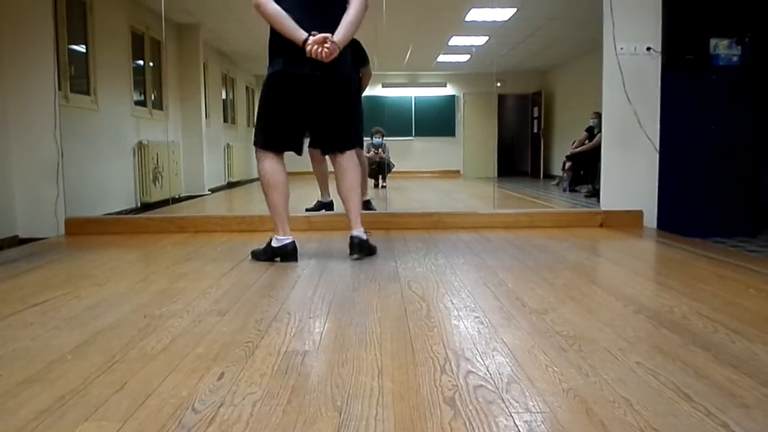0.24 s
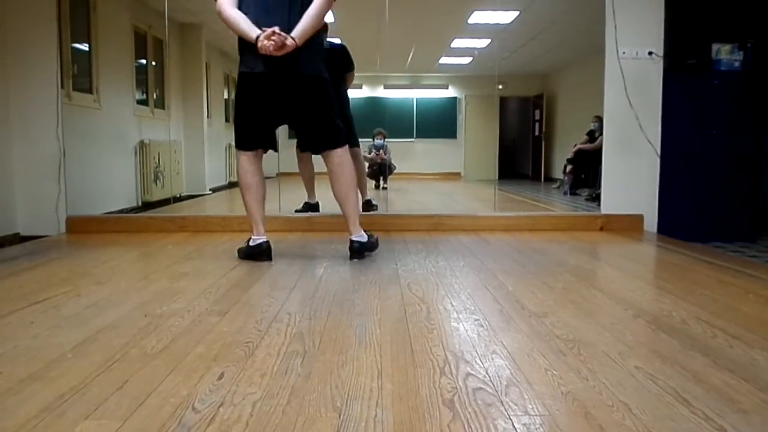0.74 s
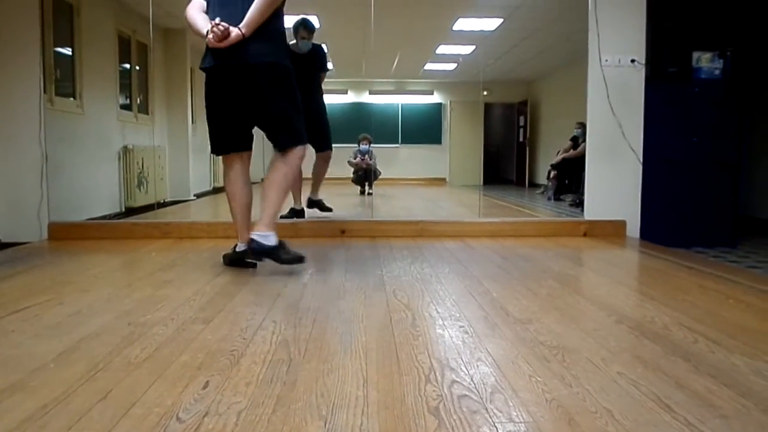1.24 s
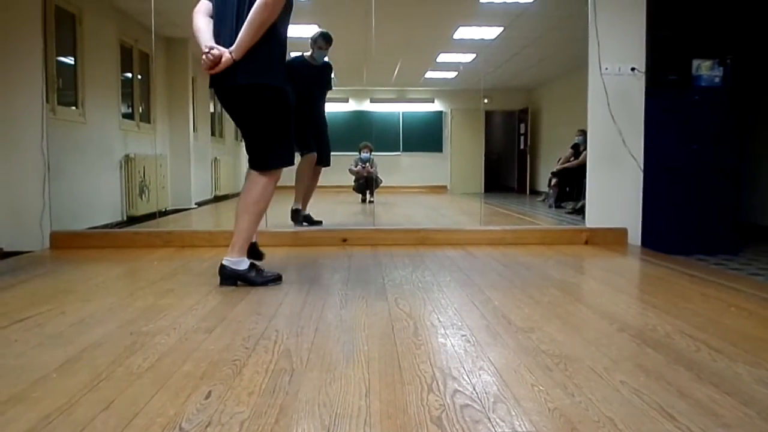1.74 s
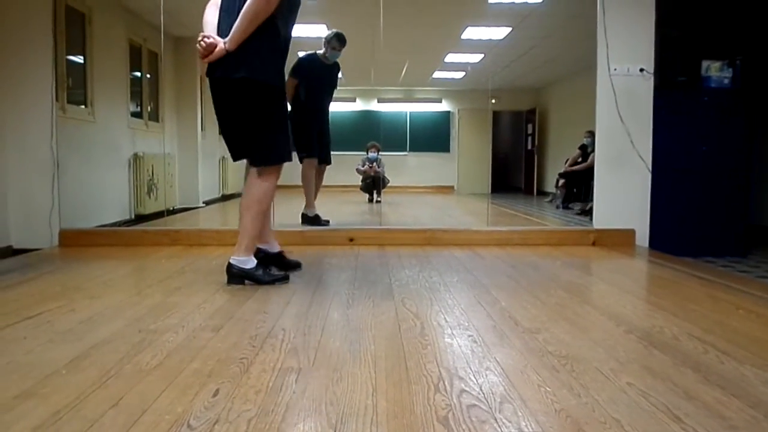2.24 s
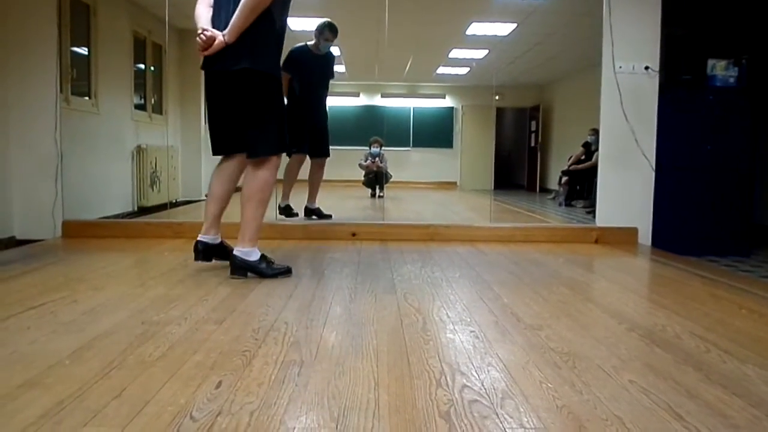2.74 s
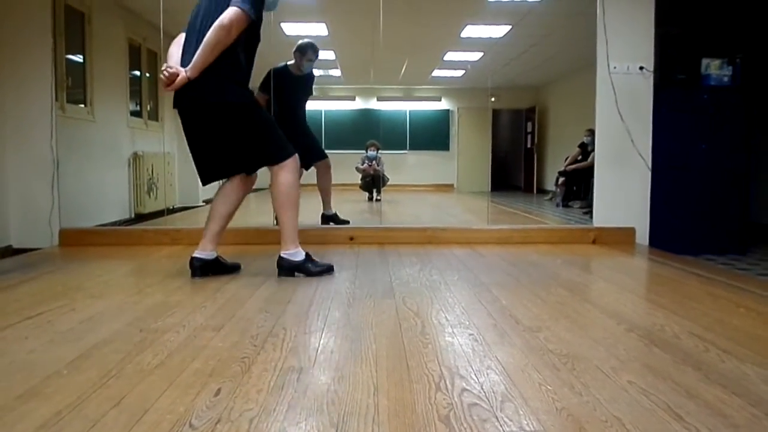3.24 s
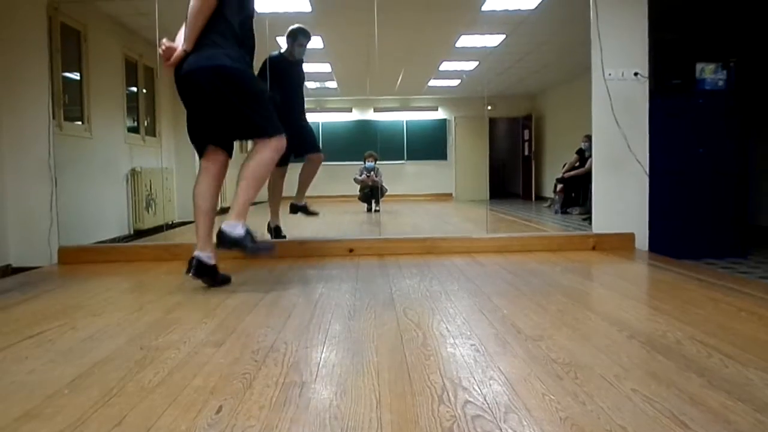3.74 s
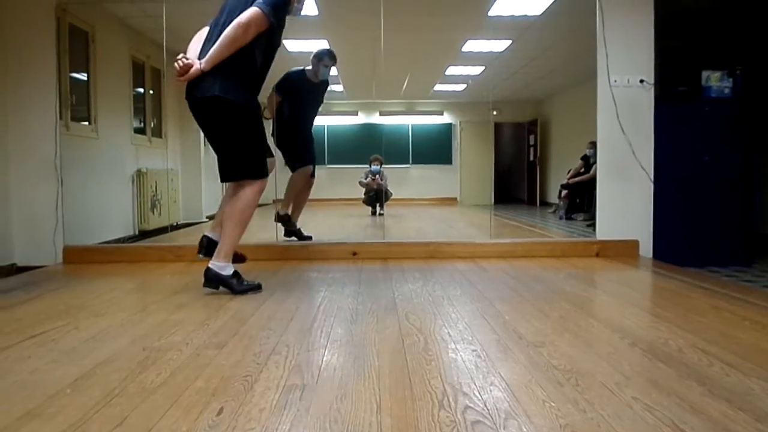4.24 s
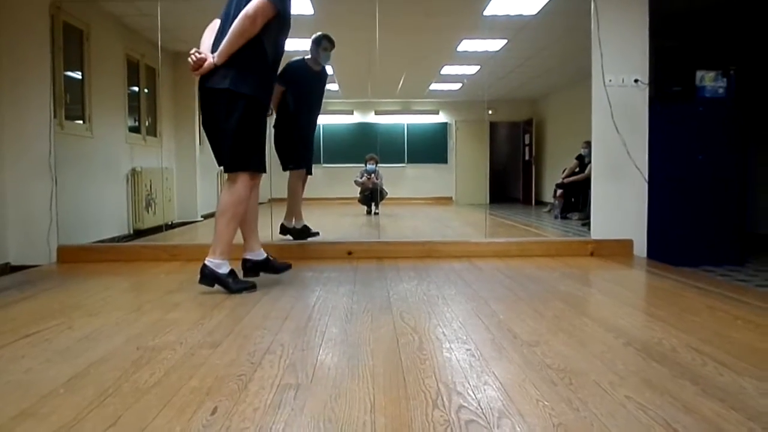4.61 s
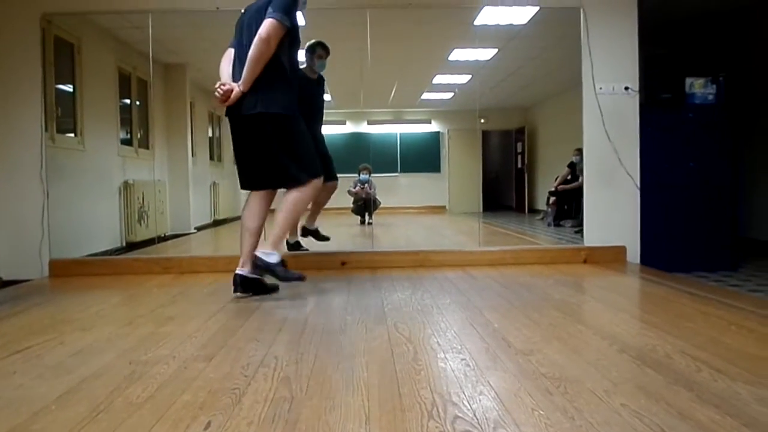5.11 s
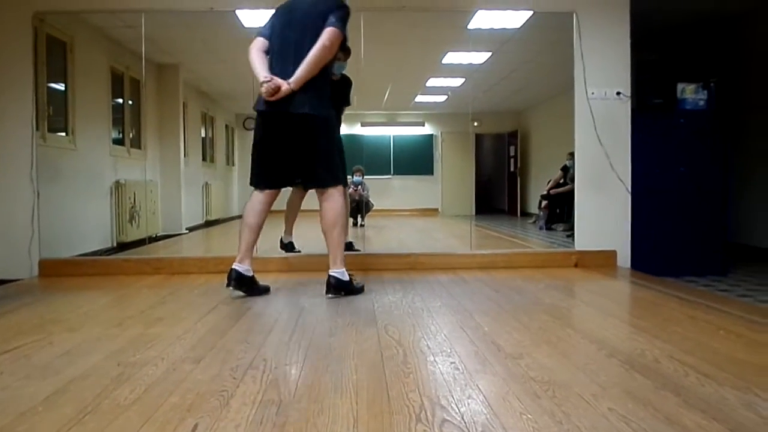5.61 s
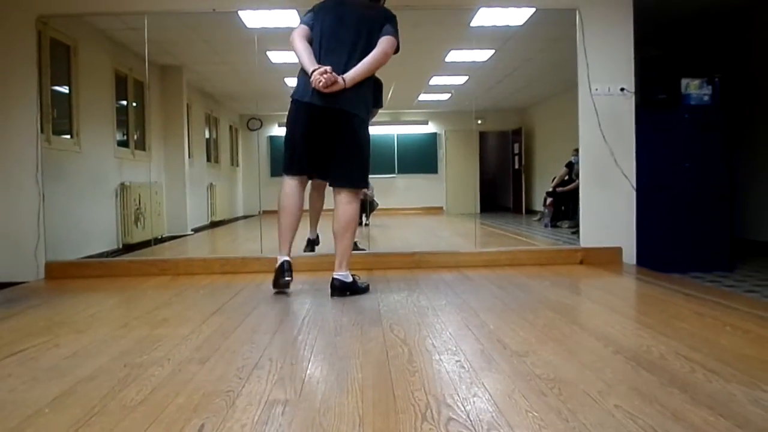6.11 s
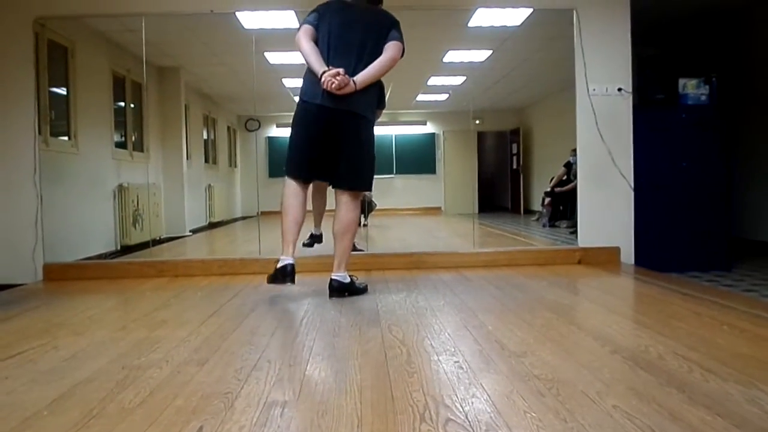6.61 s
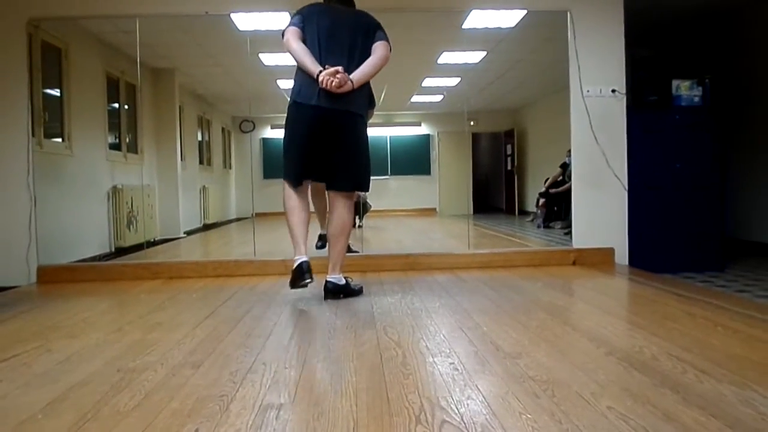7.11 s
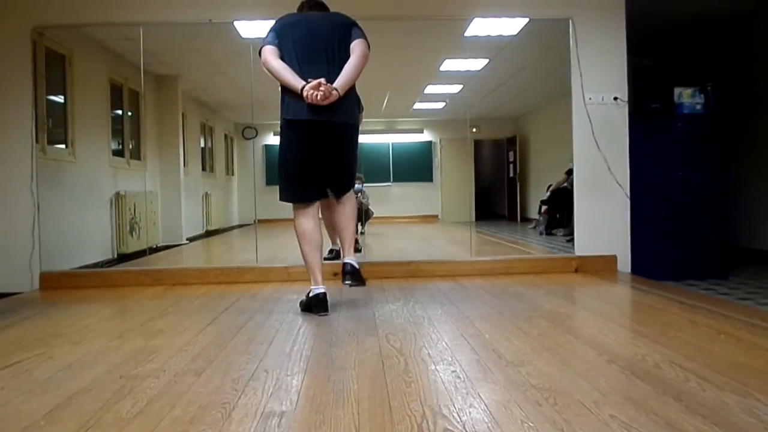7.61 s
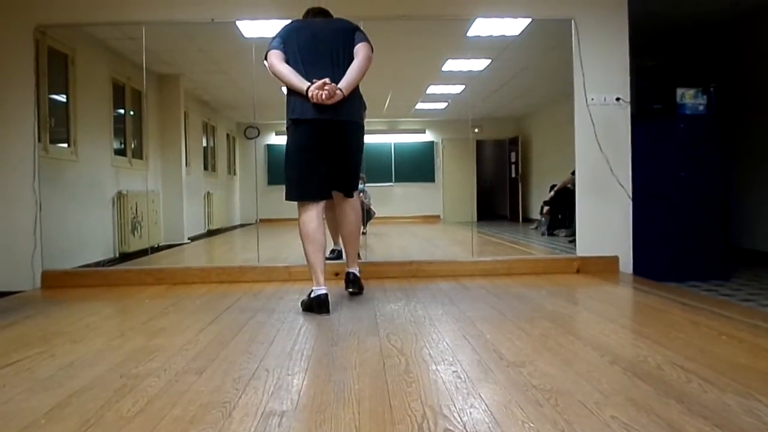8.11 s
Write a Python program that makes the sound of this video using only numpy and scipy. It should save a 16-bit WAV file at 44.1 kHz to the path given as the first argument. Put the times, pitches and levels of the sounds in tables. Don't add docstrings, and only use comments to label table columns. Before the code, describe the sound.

In a bare, live studio, hard-soled shoes strike a sprung wooden floor, picked up by a small microphone at floor height. The tail of an earlier step and a low floor rumble open the sound, with duller heel knocks at 0.05, 0.3 and 0.6 s. Crisp double toe taps follow at 1.1 and 1.4 s, then a tight cluster at 2.0, a flatter step at 2.3, a brush around 2.5, and sharp clicks at 2.8 and 3.1. A muffled low thud comes at 3.5, a quick three-tap run at 3.75-3.95, then taps at 4.4 and 4.7 with a sudden scuff between. Bright taps land at 5.3 and 5.6, then steadier at 6.1, 6.4, 6.7 and 6.95. Strong clicks sound at 7.3, 7.8 and 8.1. Each rings woody and echoes briefly over faint hush.

```python
import sys
import numpy as np
from scipy import signal
from scipy.fft import rfft, irfft, next_fast_len
from scipy.io import wavfile
from scipy.ndimage import uniform_filter1d, map_coordinates

SR = 44100
rng = np.random.default_rng(int(sys.argv[2]) if len(sys.argv) > 2 else 0)


def unload_wav(signal):
    wavfile.write(
        sys.argv[1],
        SR,
        np.round(np.clip(np.atleast_2d(signal).T, -1, 1) * 32767).astype(np.int16),
    )


def level_to_linear(level):
    exponent = np.asarray(level, float) / 20
    return 10 ** exponent


N = 368235
RING = 4 * SR // 5
BLOW = 2 ** 13
LEAD = 400
DETUNE, SPREAD = 0.04, 0.24
UPPER_DB = -6.5

# start in seconds, click in dB, deep boom in dB and
# knock in dB (both relative to the click), board note in Hz.
HEELS = [(-.22, -4.5, -10, -13, 1020), (0.0501, -15, -6.5, -0.5, 1050), (0.2967, -14.5, -9, -2, 681),
         (0.589, -11.5, -10, -5, 917), (1.9731, -20.5, 2, 4, 670), (1.9942, -8, -21.5, -15, 732),
         (2.2787, -19.5, -12, -15.5, 829), (2.8159, -5, -29.5, -12, 663), (3.1145, -12.5, -16, -6.5, 926),
         (3.5407, -51, 1, 0.5, 614), (7.272, -3, -37.5, -15, 730), (8.129, -5, -29, -17, 600)]
# start in seconds, click in dB, weight in dB, edge in dB, sole note in Hz.
TOES = [(1.1304, -7.5, -15, -8, 2270), (1.434, -7.5, -11.5, -10, 2100), (3.746, -7.5, -18, -9.5, 2600),
        (3.8304, -11.5, -7.5, -11, 2460), (3.9419, -9.5, -17.5, -5.5, 2720),
        (4.4404, -14, -13.5, -9.5, 1820), (4.733, -5.5, -15.5, -14.5, 3100), (5.267, -9.5, -15, -9, 3920),
        (5.569, -4, -19, -11.5, 2540), (6.1302, -9, -13, -10, 2250), (6.4118, -8, -16.5, -12.5, 1900),
        (6.6879, -5, -12, -15, 2680), (6.9505, -7.5, -13.5, -13.5, 2270), (7.8162, -2, -27, -13, 2420)]
# start in seconds, click in dB,
# weight in dB, edge in dB, sole note in Hz.
SLAPS = [(0.0623, -25.5, -12, 1.5, 2060), (0.279, -33.5, -7, 7.5, 3880), (1.1379, -7.5, -28.5, -28, 3750),
         (1.442, -11, -17, -31.5, 2350), (1.9822, -15.5, -2.5, -13, 3160), (2.0007, -16.5, -22, 4, 2790),
         (2.0082, -21.5, -2.5, -9, 2590), (2.2843, -9.5, -20.5, -24.5, 1900),
         (2.8287, -11.5, -8.5, -1, 2780), (3.1362, -6.5, -11, -9.5, 2270), (3.7556, -10, -19, -30, 3000),
         (3.8385, -16.5, -11.5, -14, 2800), (3.9486, -14.5, -19.5, -24, 2720),
         (4.4461, -6.5, -24.5, -17, 2340), (4.7393, -4, -18, -25, 2260), (5.2728, -3.5, -29.5, -18.5, 2030),
         (5.5741, -18, -5, -18, 2400), (6.745, -20.5, -12, -15.5, 2270), (7.8231, -13.5, -9, -26, 2300)]
# start in seconds, hold in seconds, level in dB.
SWAYS = [
    (-.1, 0.68, -39.5),
    (3.0, .1, -65),
    (3.854, 0.21, -69.5),
    (7.35, 0.16, -55.5),
    (7.853, .1, -69),
]
# peak in seconds, level in dB, rise in seconds and fall in seconds
# (each over 20 dB).
STROKES = [
    (0.78, -68, .05, .12),
    (1.77, -55, 0.095, .06),
    (1.902, -61, 0.19, 0.064),
    (2.51, -46.5, 0.15, 0.18),
    (2.77, -50, 0.36, 0.031),
    (4.53, -35.5, 0.041, .17),
    (6.085, -50, 0.13, 0.053),
    (7.68, -61, 0.25, .2),
]
# start in seconds, level in dB, board note in Hz.
SHIFTS = [
    (2.7, -43, 409),
    (4.649, -29.5, 622),
    (7.735, -36, 950),
]
# centre in Hz, width in Hz, level in dB.
SOLE = [(2435, 880, -1), (3400, 2600, -2.5)]
# centre in Hz, width in Hz, level in dB.
EDGE = [(8500, 27000, 6.5), (11760, 1500, 14), (14500, 4300, -28)]
# centre in Hz, width in Hz, level in dB.
BOARDS = [(610, 156, 12.5), (680, 730, 6), (990, 760, 2), (1310, 110, 1)]
# centre in Hz, width in Hz, level in dB.
PANELS = [(245, 74, -3), (313.5, 70, 4), (434.4, 130, 0.5)]
# centre in Hz, width in Hz, level in dB.
JOISTS = [(85, 56, -4), (158, 83, 3)]
# delay in seconds, level in dB.
WALLS = [(.0006, -3), (.0052, -3), (.0088, -2), (.012, -7), (.0172, -6), (.022, -9)]
# frequency in Hz, time to fall 60 dB in seconds.
EARLY = [(60, 0.11), (300, 0.6), (1000, 0.13), (3000, 0.12), (12000, 0.12)]
# frequency in Hz, time to fall 60 dB in seconds.
LATE = [(60, 0.27), (160, 1.0), (420, 1.0), (1100, 0.8), (2900, 0.85), (7700, 0.76), (14000, 0.4)]
# frequency in Hz, level in dB.
WET = [(60, -1), (300, 7), (1000, 11), (3000, -1), (7000, -3.5), (12000, -0.5)]
# frequency in Hz, level in dB, time to fall 60 dB in seconds.
STANDING = [(89, 1.5, 0.61), (157.1, 2, 0.77), (205.7, 0, 1.05), (254, 4.5, 0.92), (290.7, -11.5, 2),
            (321, 2.5, 0.86), (375, -8.5, 1.52), (427, -3, 0.73), (490, 6.5, 0.25)]
# frequency in Hz, density in dB per Hz.
VARNISH = [(300, 4.5), (1000, -2), (3000, -11), (8000, -9), (11900, -0.5), (15000, -6)]
# frequency in Hz, density in dB per Hz.
HUSH = [(15, -24), (25, -23), (87, -7.5), (483, 8), (553, 4.5), (1550, -15.5), (2900, -21), (7920, -32.5),
        (11900, -17), (16500, -21.5)]
# frequency in Hz, gain in dB.
MICROPHONE = [(40, -3.5), (120, -3.5), (300, -4), (550, -3), (1000, 3), (2500, 3), (6000, -0.5),
              (12000, -4.5), (15300, -12), (16300, -32.5), (17000, -71)]


def along(points, hz):
    f, v = np.transpose(points)
    return np.interp(np.log(hz + 1), np.log(f + 1), v)


def noise(gain):
    m = next_fast_len(N)
    spectrum = rfft(rng.standard_normal(m)) * gain(np.fft.rfftfreq(m, 1 / SR))
    x = irfft(spectrum, m)[:N]
    return x / np.std(x)


def wobble(rate):
    knots = rng.standard_normal(int(N * rate / SR) + 4)
    return map_coordinates(knots, [np.arange(N) * rate / SR])


def swell(start, end, db, rise_s, fall_s):
    t = np.arange(N) / SR
    outside = np.maximum((start - t) / rise_s, (t - end) / fall_s)
    return level_to_linear(db - 20 * np.maximum(outside, 0))


def power(modes, db, scatter_db=2.5, detune=DETUNE):
    f = np.fft.rfftfreq(BLOW, 1 / SR)
    total = 0
    for (centre, width, mode_db), (a, b) in zip(modes, rng.standard_normal((len(modes), 2))):
        c = centre * (1 + detune * b)
        shape = (f * width) ** 2 / ((c * c - f * f) ** 2 + (f * width) ** 2)
        total = total + level_to_linear(2 * (db + mode_db + scatter_db * a)) * shape ** (3 / 2)
    return total


def causal(spectrum):
    cepstrum = irfft(np.log(spectrum + 1e-12) / 2)
    cepstrum[1:BLOW // 2] *= 2
    cepstrum[BLOW // 2 + 1:] = 0
    return irfft(np.exp(rfft(cepstrum)))[:BLOW // 2]


def scattered(x, spread_s):
    knots = spread_s * rng.random(40)
    delay = np.interp(np.linspace(0, len(knots) - 1, BLOW // 2 + 1), np.arange(len(knots)), knots)
    phase = 2 * np.pi * np.cumsum(delay) * SR / BLOW
    return irfft(rfft(x, BLOW) * np.exp(-1j * phase))[:BLOW // 2]


def through_floor():
    rise = np.exp(np.arange(-LEAD, 0) / SR / 0.003)
    return level_to_linear(-22) * uniform_filter1d(rng.standard_normal(LEAD), size=4) * rise


def reverberation(late_db, wet_db):
    hz, t, z = signal.stft(rng.standard_normal(RING), SR, nperseg=256)
    early = level_to_linear(-60 * t / along(EARLY, hz)[:, None])
    late = level_to_linear(late_db - 60 * t / along(LATE, hz)[:, None])
    strength = level_to_linear(along(WET, hz))[:, None]
    tail = signal.istft(z * (early + late) * strength, SR, nperseg=256)[1][:RING]
    build_up = 1 - np.exp(-np.arange(RING) / SR / 0.005)
    return level_to_linear(wet_db) * tail * build_up


def standing(db):
    t = np.arange(RING // 10) * 10 / SR
    notes = 0
    for (hz, mode_db, t60), (a, b) in zip(STANDING, rng.standard_normal((len(STANDING), 2))):
        notes = notes + level_to_linear(db + mode_db + 2.5 * a - 60 * t / t60) * np.sin(2 * np.pi * (hz * t + b))
    return signal.resample(notes * np.minimum(t / 0.0056, 1), RING)


def wall_echoes():
    echoes = np.zeros(RING)
    for (s, db), (a, b) in zip(WALLS, rng.standard_normal((len(WALLS), 2))):
        echoes[round(s * (1 + 0.04 * abs(a)) * SR)] = level_to_linear(db + 1.5 * b)
    dull = np.exp(-2 * np.pi * 5000 / SR)
    return signal.lfilter([(1 - dull) ** 2], [1, -2 * dull, dull ** 2], level_to_linear(-2) * echoes)


def near_boards():
    def lag(hz):
        rate = 2 * np.pi * hz / SR
        return rate * np.exp(-rate * np.arange(LEAD))
    return level_to_linear(7.5) * (lag(700) - lag(220))


def studio(late_db, wet_db):
    response = reverberation(late_db, wet_db) + standing(db=-49.0) + wall_echoes()
    response[0] = 1
    response[:LEAD] += near_boards()
    return response


def contact(db, deep_db, boom_db, knock_db, edge_db, note_db, note_hz, upper_db, upper_hz, board_hz):
    board = power(BOARDS, knock_db + 17.5)
    board = board + power([(board_hz, 160, 0)], knock_db + 26.0, scatter_db=0, detune=0)
    wood = power(JOISTS, deep_db + 37.5) + power(PANELS, boom_db + 31.0) + board
    notes = [(note_hz, 0.4 * note_hz, 12), (upper_hz, 0.28 * upper_hz, upper_db + 15)]
    sole = power(SOLE, 8.83) + power(notes, note_db - db, scatter_db=0, detune=0)
    edge = power(EDGE, edge_db + 13, detune=DETUNE / 2)
    blow = scattered(causal(wood + sole + edge), spread_s=0.0008)
    path = np.append(through_floor(), studio(late_db=-13.5, wet_db=-24))
    return level_to_linear(db) * signal.fftconvolve(blow, path)[:RING]


def heel(db, deep_db, knock_db, board_hz):
    a, b = np.exp(SPREAD * rng.standard_normal(size=2))
    return contact(db, deep_db, boom_db=-8.5 + 0.55 * knock_db, knock_db=knock_db, edge_db=-12,
                   note_db=db + 3, note_hz=2580 * a, upper_db=UPPER_DB, upper_hz=5490 * b, board_hz=board_hz)


def tap(db, weight_db, edge_db, note_hz, deep_db, knock_db, note_db, board_hz):
    hard_db = edge_db + 13
    spot = np.exp(SPREAD * rng.standard_normal())
    return contact(db, weight_db + deep_db, boom_db=weight_db, knock_db=knock_db + 0.54 * weight_db,
                   edge_db=edge_db, note_db=db + note_db - 0.81 * hard_db, note_hz=note_hz,
                   upper_db=UPPER_DB + 0.7 * hard_db, upper_hz=2.27 * note_hz, board_hz=board_hz * spot)


def toe(*row):
    return tap(*row, deep_db=-21.5, knock_db=-9, note_db=3, board_hz=730)


def slap(*row):
    return tap(*row, deep_db=-5.5, knock_db=-14.5, note_db=-8.5, board_hz=600)


def steps():
    out = np.zeros(N + 3 * RING)
    for strike, table in [(heel, HEELS), (slap, SLAPS), (toe, TOES)]:
        for s, *row in table:
            first = RING + round((s + 0.0017) * SR) - LEAD
            out[first:][:RING] += strike(*row)
    return out[RING:RING + N]


def rumble():
    sway = level_to_linear(-86) + sum(swell(s, s + hold, db, 0.1, 0.56) for s, hold, db in SWAYS)
    return sway * noise(lambda hz: 1 / (1 + ((hz - 38) / 7) ** 2) ** 2)


def hush():
    return level_to_linear(-57.5 + 0.8 * wobble(17.0)) * noise(lambda hz: level_to_linear(along(HUSH, hz)))


def brushing():
    stroke = sum(swell(s, s, db, rise, fall) for s, db, rise, fall in STROKES)
    soft = uniform_filter1d(uniform_filter1d(stroke, size=1500), size=1500)
    grain = level_to_linear(1.5 * wobble(90))
    return level_to_linear(-0.5) * soft * grain * noise(lambda hz: level_to_linear(along(VARNISH, hz)))


def shifts():
    out = np.zeros(N + RING)
    for s, db, hz in SHIFTS:
        push = np.hanning(900) * rng.standard_normal(900)
        board = signal.fftconvolve(push, causal(power([(hz, 300, 0)], db - 0.5)))
        heard = signal.fftconvolve(board, studio(late_db=-27, wet_db=-34.0))
        out[round(s * SR):][:RING] += heard[:RING]
    return out[:N]


def scene():
    return (steps() + rumble() + hush() + brushing() + shifts())[None]


def low_pass(x):
    return signal.sosfilt(signal.butter(12, 16820, fs=SR, output="sos"), x)


def record(dry):
    m = next_fast_len(N + BLOW)
    response = level_to_linear(along(MICROPHONE, np.fft.rfftfreq(m, 1 / SR)))
    heard = irfft(rfft(dry, m) * response, m)[:, :N]
    soft = heard / (1 + np.abs(heard / 0.85) ** 4) ** (1 / 4)
    return low_pass(soft)


dry = scene()
out = record(dry)
unload_wav(out)
```